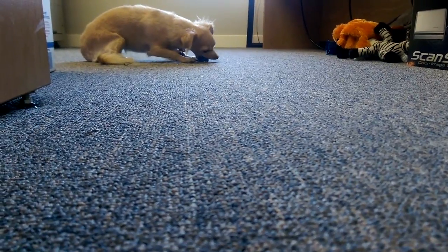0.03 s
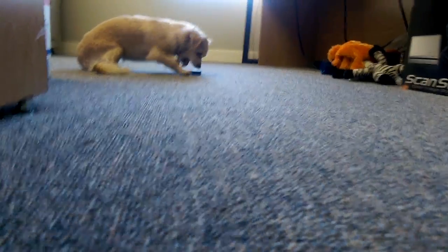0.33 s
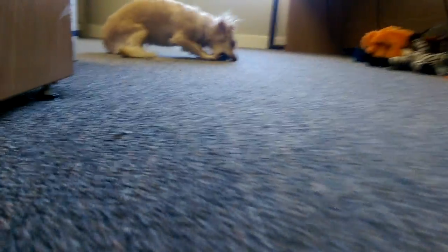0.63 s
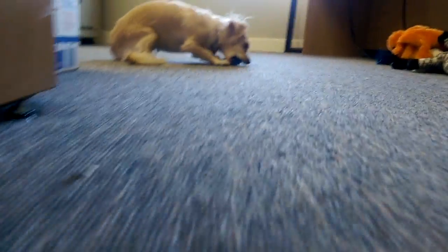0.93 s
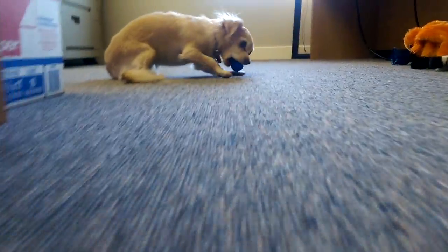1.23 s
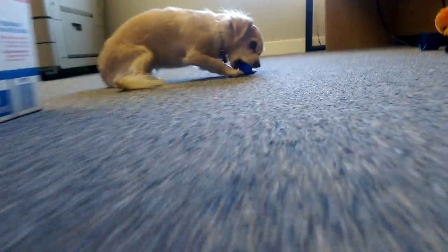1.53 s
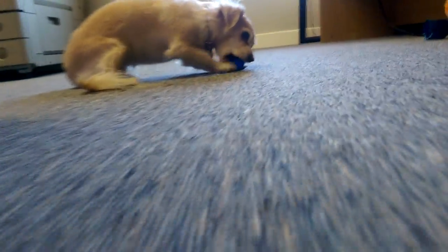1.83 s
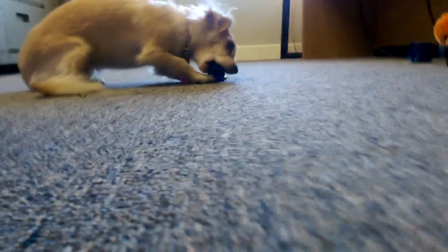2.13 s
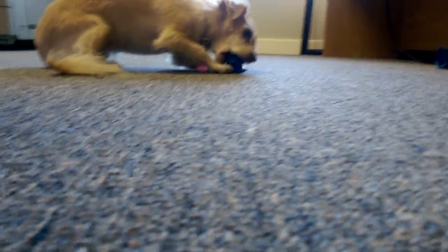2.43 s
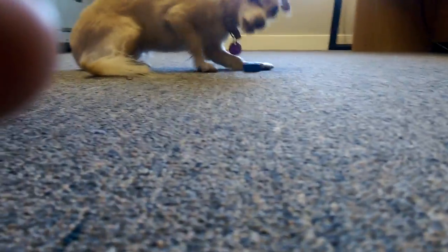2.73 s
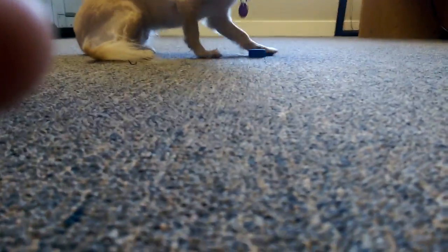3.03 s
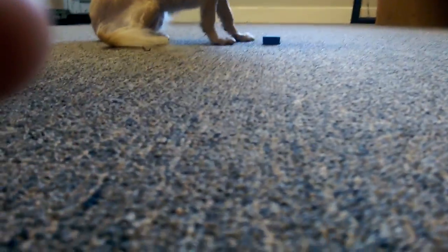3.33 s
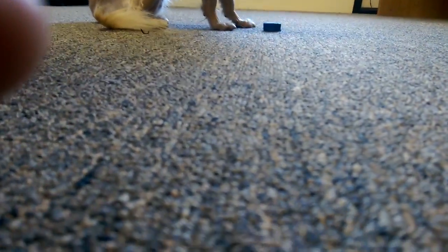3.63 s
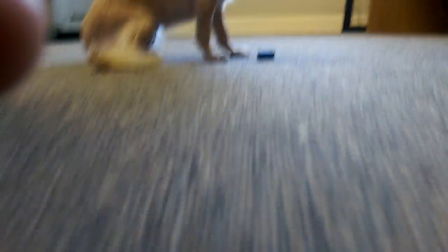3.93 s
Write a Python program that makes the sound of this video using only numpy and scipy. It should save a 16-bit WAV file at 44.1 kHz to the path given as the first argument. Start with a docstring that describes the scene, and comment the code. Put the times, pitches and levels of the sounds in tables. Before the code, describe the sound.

Carpet rubbing against a sliding camera, followed by light handling clicks and dull thumps.

```python
"""Loop-pile carpet brushes the case of a camera pushed over it in a quiet, humming room.
Countless fibre flicks add up to a hiss and drive the case into a rumble; the push speeds up and stops.
The case is then handled: faint ticks, knocks that ring its modes, a rasp and one short scrape of an edge.
A quick run of dull thumps travels through the floor as bending waves, and a new push begins."""
import sys
import numpy as np
from scipy import signal
from scipy.fft import rfft, irfft
from scipy.io import wavfile

SR = 44100
rng = np.random.default_rng(int(sys.argv[2]) if len(sys.argv) > 2 else 0)


def int16_out(signal):
    """Quantize to a 16-bit WAV file."""
    q = np.round(np.clip(np.atleast_2d(signal).T, -1, 1) * 32767)
    wavfile.write(sys.argv[1], SR, q.astype(np.int16))


N = 176400
T, HZ = np.arange(N) / SR, np.fft.rfftfreq(N, 1 / SR)

# fibre hiss (frequency [Hz], relative density [dB] setting off, gliding, at full speed, braking)
FIBRE_COLOURS = [(365, -6, -21, -18, -5.5), (670, 4, -5.5, -1.5, -5), (1060, -1.5, -4, -1.5, -1),
                 (1660, 0.5, -3, -0.5, -0.5), (2420, 1, 0, 0.5, 2), (3000, 2.5, 0.0, 0.5, -1.5),
                 (4300, -3.5, -6, -5.0, -5), (5700, -5.5, -6.5, -6, -7.5), (7700, -8, -9, -3.5, -9),
                 (9100, -9, -10.5, -6.5, -10), (11600, -11, -12, -12.5, -13.5), (13200, -21, -14, -15, -15),
                 (15600, -19, -17.5, -19, -21)]
# rumble of the case (frequency [Hz], relative density [dB])
CASE_COLOUR = [(60, -13), (170, -10.5), (290, -1.5), (355, 2), (450, -1), (650, -6), (850, -17),
               (1200, -40), (3000, -82)]
# microphone port balance (frequency [Hz], left minus right [dB] early in the push, late in the push)
PUSH_BALANCE = [(400, -0.5, -10), (750, -1.5, -5), (1100, -10, -3.5), (1710, -4.5, -1.5), (2400, -3.5, -6),
                (3600, -4.5, -1.5), (5230, -9, -6), (7400, -12, -16.5), (8900, -4.5, -9), (10800, -13, -11),
                (14000, -12, -15), (15400, -19, -16)]
# port balance of the rasp and scrape (frequency [Hz], left minus right [dB])
EDGE_BALANCE = [(150, -1), (450, -14), (1000, -5), (2400, -9), (3700, -5), (6000, -12), (15000, -18)]
# blows on the case (time [s], peak [dB], pitch [Hz], t60 [s], left minus right [dB], scuff re blow [dB])
KNOCK_BLOWS = [(0.2844, -40.5, 347, 0.19, -3.5, -25), (0.605, -44.5, 250, 0.33, -2, -14),
               (1.022, -41.5, 227, 0.44, -4, -18), (1.321, -36, 330, .05, -3, -14),
               (2.332, -45, 357, 0.082, -10, -24), (2.613, -41.5, 306, 0.04, -4, -24),
               (2.706, -36, 327, 0.068, -3, -14), (2.786, -41.5, 238, 0.071, -2, -10),
               (2.819, -36.5, 250, 0.028, -4, -13), (2.832, -44.5, 260.2, 0.093, -10, -12.5),
               (3.128, -28, 300, 0.046, -11, -13.5), (3.1412, -28, 275, 0.14, -5, -16)]
# blows on the floor (time [s], level [dB], starting pitch [Hz], duration [s])
FLOOR_BLOWS = [(3.317, -30.5, 274, 0.0264), (3.343, -39, 298, 0.02), (3.36, -33.5, 265, .02)]


def amp(db):
    """Decibels to amplitude ratio."""
    return 10 ** (np.asarray(db) / 20)


def unit(x):
    """Normalisation to rms 1."""
    return x / np.sqrt(np.mean(x ** 2) + 1e-20)


def spectrum(points):
    """Interpolation on a log-frequency axis."""
    hz, value = np.transpose(points)
    return np.interp(np.log(HZ + 1), np.log(hz + 1), value)


def level(points):
    """Amplitude envelope from (time [s], level [dB]) rows, silent outside them."""
    return amp(np.interp(T, *np.transpose(points), left=-120, right=-120))


def column(table, index):
    """One column of a table, paired with its frequencies."""
    return np.array(table)[:, [0, index]]


def pan(db):
    """A level difference as left and right gains of mean 1."""
    gains = amp(np.array([db / 2, -db / 2])).reshape(2, -1)
    return gains / gains.mean(0)


def add(mix, s, sound):
    """Superposition of a sound starting at s seconds."""
    part = mix[:, max(round(s * SR), 0):][:, :sound.shape[-1]]
    part += sound[..., :part.shape[1]]


def noise(response):
    """Filtered white noise of rms 1."""
    return unit(irfft(rfft(rng.standard_normal(N)) * response, N))


def ports(drive, colour, balance, coherence, lead=0):
    """Partial coherence: two ports share part of a coloured random drive; their mean has rms 1."""
    common, separate = rfft(drive)
    c = np.clip(spectrum(coherence), 0, 1)
    left, right = pan(spectrum(balance))
    left_drive = c * common + np.sqrt(1 - c ** 2) * separate
    pair = np.array([left * np.exp(1j * lead) * left_drive, right * common])
    sum_gain = np.sqrt(left ** 2 + right ** 2 + 2 * c * left * right * np.cos(lead))
    x = irfft(pair * amp(spectrum(colour)) / sum_gain, N)
    return x / np.std(x.mean(0))


def friction(colour, balance, coherence=None):
    """Shot noise: countless fibres brush the case, some flick harder; uneven pile makes it flutter."""
    # likeness of the ports for a near source (frequency [Hz], coherence [0-1])
    near_coherence = [(100, 0.97), (400, 0.99), (800, 0.73), (2400, 0.84), (4400, 0.18), (8000, 0.082),
                      (15000, .05)]
    # lead of the left port (frequency [Hz], phase [rad])
    left_lead = [(100, -1), (780, 0.54), (1380, 1), (2400, .5), (5000, 1.2), (7000, 4)]
    flicks_per_s, spread_db, flick_share = 4000, 2.2, 0.26
    flutter_db, flutter_hz = 0.57, 25
    sizes = amp(spread_db * np.minimum(rng.exponential(1, (2, N)), 5))
    flicks = sizes * rng.choice([-1, 1], (2, N)) * (rng.random((2, N)) < flicks_per_s / SR)
    drive = np.sqrt(flick_share) * unit(flicks) + np.sqrt(1 - flick_share) * rng.standard_normal((2, N))
    flutter = amp(flutter_db * noise(1 / (1 + (HZ / flutter_hz) ** 4)))
    return ports(drive * flutter, colour, balance, coherence or near_coherence, spectrum(left_lead))


def ring(modes, attack_s):
    """Free decay of modes (frequency [Hz], level [dB], t60 [s]) of alternating sign, peak 1."""
    t = np.arange(SR // 3) / SR
    x = sum((-1) ** k * amp(db - 60 * t / t60) * np.sin(2 * np.pi * hz * t)
            for k, (hz, db, t60) in enumerate(modes))
    x = x * (1 - np.exp(-t / attack_s))
    return x / abs(x).max()


def room(split_hz=600):
    """Broadband air noise, with a ventilation hum that wavers as narrow bands of noise do."""
    # room air (frequency [Hz], relative density [dB])
    air_colour = [(12, -52), (20, -14), (76, -4), (109, 0.5), (129, -6), (144, -10), (245, -15.5),
                  (274, -19.5), (404, -26), (767, -33.5), (958, -33), (1070, -38.5), (2760, -39),
                  (4810, -42.5), (15500, -46)]
    # its balance (frequency [Hz], left minus right [dB])
    air_balance = [(60, -3), (150, -1), (380, 0), (950, -1), (2380, -2), (5980, -3), (15000, -8)]
    # its likeness at the ports (frequency [Hz], coherence [0-1])
    air_coherence = [(60, 0.98), (300, 0.71), (600, 0.12), (1200, 0.022), (15000, 0.013)]
    # swell of its hiss (time [s], gain [dB])
    hiss_gain = [(0, 0), (.35, 0), (2.4, 5), (3.0, 4), (3.7, 4)]
    # ventilation bands (frequency [Hz], width [Hz], level [dB])
    hum_bands = [(59.46, 1.2, -67.5), (75.5, 4.8, -70.5), (98.6, 1.6, -62), (120.44, 6.8, -62)]
    air = ports(rng.standard_normal((2, N)), air_colour, air_balance, air_coherence)
    low = irfft(rfft(air) / (1 + (HZ / split_hz) ** 4), N)
    hiss = (air - low) * amp(np.interp(T, *np.transpose(hiss_gain)))
    hum = sum(amp(db) * noise(1 / (1 + (2 * (HZ - hz) / width) ** 2)) for hz, width, db in hum_bands)
    return amp(db=-52.5) * (amp(db=-2.5) * low + hiss) + pan(db=-2.5) * hum


def shifts():
    """Sliding friction swells and dies each time the resting camera is nudged."""
    # nudges (start [s], peak [s], end [s], hiss level [dB], rumble level [dB])
    nudges = [(0.03, 0.069, 0.12, -68.5, -68), (2.436, 2.55, 2.61, -64.5, -67),
              (2.638, 2.683, 2.81, -63, -62), (2.757, 2.848, 2.91, -64.5, -59.5),
              (3.15, 3.18, 3.44, -69.5, -62.5), (3.773, 3.893, 4.28, -62, -66.5),
              (3.9, 3.95, 4.02, -48, -55.5)]
    hiss = friction(column(FIBRE_COLOURS, -1), column(PUSH_BALANCE, -1))
    rumble = friction(CASE_COLOUR, column(PUSH_BALANCE, 1))
    out = np.zeros((2, N))
    for start, peak, end, hiss_db, rumble_db in nudges:
        swell = np.sin(np.pi / 2 * np.interp(T, [start, peak, end], [0, 1, 0])) ** 0.87
        out += swell * (amp(hiss_db) * hiss + amp(rumble_db) * rumble)
    return out


def brush():
    """Faint, high friction noise as the camera first stirs, and lingering after the scrape."""
    # brushing (time [s], level [dB])
    envelope = [(0.03, -82), (0.08, -66), (0.13, -92), (3.1, -110), (3.16, -65), (3.22, -69), (3.39, -68),
                (3.46, -76)]
    # its spectrum (frequency [Hz], relative density [dB])
    colour = [(3000, -23), (6500, -4), (8300, -2), (10500, -7), (15500, -5.5)]
    return level(envelope) * friction(colour, column(PUSH_BALANCE, -1))


def knocks(soft_hz=615):
    """Impact excitation of the case: a soft blow hardly rings the modes above soft_hz."""
    # modes of the case (frequency / pitch [ratio], relative level [dB], share of the t60 [ratio])
    case_modes = [(.27, -4.5, 1.94), (.7, -3.5, 1), (1.03, 3, 0.8), (1.3, -3.5, 0.4), (1.8, -12.5, 0.41),
                  (3.1, -46, .4)]
    out = np.zeros((2, N))
    for s, db, hz, t60, pan_db, _ in KNOCK_BLOWS:
        modes = [(hz * ratio, mode_db - 10 * np.log10(1 + (hz * ratio / soft_hz) ** 6), t60 * share)
                 for ratio, mode_db, share in case_modes]
        add(out, s, amp(db) * pan(pan_db) * ring(modes, attack_s=0.0017))
    return out


def scuffs(decay_s=0.013, thump_scuff_db=-20.5):
    """Contact friction starts each knock and thump with a short, dull scuff."""
    # contact noise (frequency [Hz], relative density [dB])
    colour = [(200, -1.5), (500, -2), (900, -10), (1400, -15), (2500, -37), (6000, -50)]
    blows = [(s, db + scuff_db) for s, db, *_, scuff_db in KNOCK_BLOWS]
    blows += [(s, db + thump_scuff_db) for s, db, *_ in FLOOR_BLOWS]
    contact = sum(amp(db) * (T > s) * np.exp(-abs(T - s) / decay_s) for s, db in blows)
    return contact * friction(colour, column(PUSH_BALANCE, 1))


def push():
    """Sliding friction: the fibre hiss changes colour with speed and forces the case to rumble."""
    # fibre hiss (time [s], level [dB])
    hiss_envelope = [(0.38, -78), (0.43, -64.5), (0.51, -61.5), (0.54, -52.5), (0.69, -49.5), (0.8, -50.5),
                     (0.9, -46.5), (0.98, -48), (1.08, -46.5), (1.58, -46), (1.68, -43.5), (1.86, -45),
                     (1.98, -45.5), (2.1, -43.5), (2.23, -42), (2.36, -51), (2.39, -66), (2.42, -64)]
    # rumble of the case (time [s], level [dB])
    rumble_envelope = [(0.45, -70), (0.598, -57), (1.092, -51), (1.97, -54.5), (2.2, -49), (2.32, -59),
                       (2.336, -48.5), (2.402, -87), (2.42, -73)]
    # when each of the four fibre colours holds (time [s])
    stage_times = [.78, 1.2, 1.8, 2.2]
    hiss = np.zeros((2, N))
    for k, stage in enumerate(np.eye(len(stage_times))):
        fade = np.sqrt(np.interp(T, stage_times, stage))  # equal-power crossfade
        hiss += fade * friction(column(FIBRE_COLOURS, k + 1), column(PUSH_BALANCE, k // 2 + 1))
    rumble = friction(CASE_COLOUR, column(PUSH_BALANCE, 1))
    return level(hiss_envelope) * hiss + level(rumble_envelope) * rumble


def squeak(hz=12850, rise_s=0.00028):
    """A fibre squeaks in a tiny, quickly damped oscillation."""
    # fibre squeaks (time [s], peak [dB])
    events = [(.5611, -39)]
    out, t = np.zeros((2, N)), np.arange(400) / SR
    envelope = t / rise_s * np.exp(1 - t / rise_s)
    for s, db in events:
        add(out, s, amp(db) * pan(db=-18) * envelope * np.sin(2 * np.pi * hz * t))
    return out


def ticks():
    """One-cycle pressure pulses beside the right port: so short a pulse has a broad spectrum."""
    # ticks on the case (time [s], peak [dB], centre frequency [Hz])
    events = [(2.428, -38.5, 8000), (2.666, -39, 9000), (2.7367, -35, 8000), (2.775, -40.5, 8500),
              (3.905, -39, 8500)]
    out, t = np.zeros((2, N)), (np.arange(400) - 6) / SR
    for s, db, hz in events:
        phase = 2 * np.pi * hz * t
        pulse = -phase * np.exp((1 - phase ** 2) / 2)  # derivative of a Gaussian
        add(out, s, amp(db) * pan(db=-17) * pulse)
    return out


def rasp():
    """Faint friction noise in a narrow band as something rubs the carpet."""
    # rubbing (time [s], level [dB])
    envelope = [(2.655, -79), (2.685, -64), (2.708, -53.5), (2.725, -72)]
    # its spectrum (frequency [Hz], relative density [dB])
    colour = [(1400, -30), (1850, 2), (2300, -6), (3200, -14), (7000, -31)]
    return level(envelope) * friction(colour, EDGE_BALANCE)


def scrape(rumble_db=-2):
    """Forced resonance: an edge jerks over the pile and rings; the case rumbles most as it catches."""
    # drag of the edge (time [s], level [dB])
    drag_envelope = [(3.107, -75), (3.118, -45.5), (3.133, -41.5), (3.15, -42), (3.167, -44.5),
                     (3.182, -60.5), (3.21, -68)]
    # friction at the edge (frequency [Hz], relative density [dB])
    colour = [(300, 2), (500, 5), (800, -11), (1250, -12), (2300, -2), (3700, -13), (7500, -13.5),
              (15500, -24.5)]
    # its likeness at the ports (frequency [Hz], coherence [0-1])
    coherence = [(150, 0.6), (400, 0), (2400, 0.3), (6000, .1)]
    # resonances of the shell (frequency [Hz], bandwidth [Hz], gain [dB])
    shell_modes = [(1760, 140, 5.5), (2390, 70, -6), (2690, 89, 0), (3050, 77, 9), (4540, 400, 9.5)]
    drag = level(drag_envelope)
    shell = 1 + sum(amp(db) / (1 + 2j * (HZ - hz) / width) for hz, width, db in shell_modes)
    edge = irfft(rfft(friction(colour, EDGE_BALANCE, coherence)) * shell, N)
    catch = (drag / drag.max()) ** 2
    rumble = amp(rumble_db) * catch * friction(CASE_COLOUR, EDGE_BALANCE, coherence)
    return drag * (edge / np.std(edge.mean(0)) + rumble)


def thumps(end_pitch_ratio=0.42, ring_db=-9):
    """Dispersion: low bending waves arrive later, so each thump falls in pitch; the floor rings on."""
    # modes of the floor (frequency [Hz], relative level [dB], t60 [s])
    floor_modes = [(72, -6, 0.24), (123.6, -1, 0.23), (203.5, -4, 0.15)]
    out, t = np.zeros((2, N)), np.arange(SR // 3) / SR
    floor = amp(ring_db) * ring(floor_modes, attack_s=0.01)
    for s, db, hz, length in FLOOR_BLOWS:
        progress = np.minimum(t / length, 1)
        phase = 2 * np.pi * np.cumsum(hz * end_pitch_ratio ** progress) / SR
        wave = np.sin(phase) * abs(np.sin(np.pi * progress)) ** 0.7
        add(out, s, amp(db) * pan(db=-4) * (wave + floor))
    return out


def scene():
    """Superposition of all sources at the two microphone ports."""
    return (room() + shifts() + brush() + knocks() + scuffs() + push()
            + squeak() + ticks() + rasp() + scrape() + thumps())


def record(dry, cutoff_hz=15850):
    """Band limiting by a linear-phase low-pass filter."""
    lowpass = signal.firwin(601, cutoff_hz, window=("kaiser", 9), fs=SR)
    return signal.oaconvolve(dry, lowpass[None], "same")


dry = scene()
out = record(dry)
int16_out(out)
```